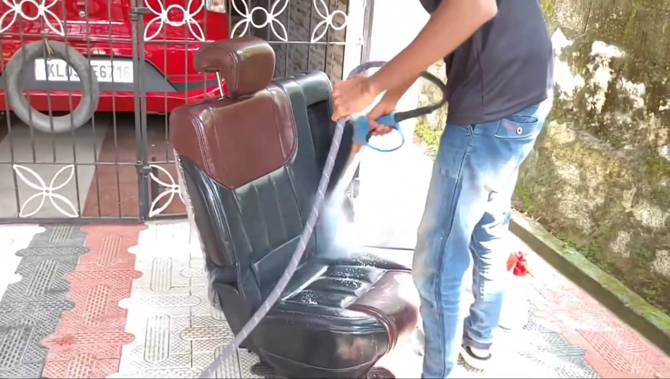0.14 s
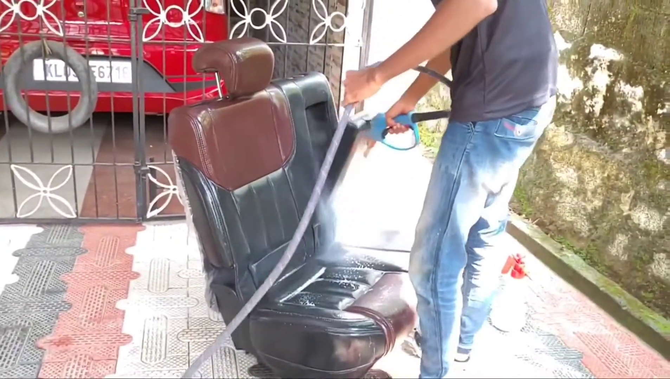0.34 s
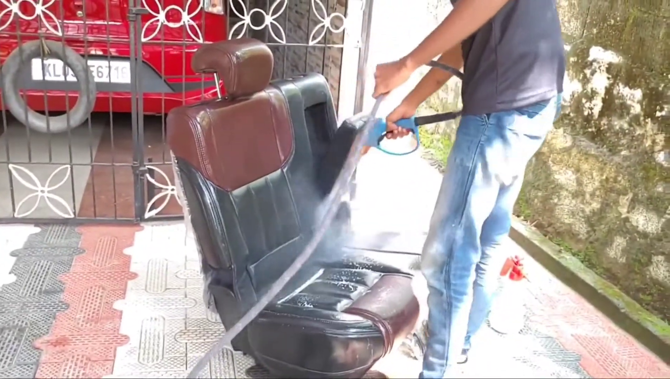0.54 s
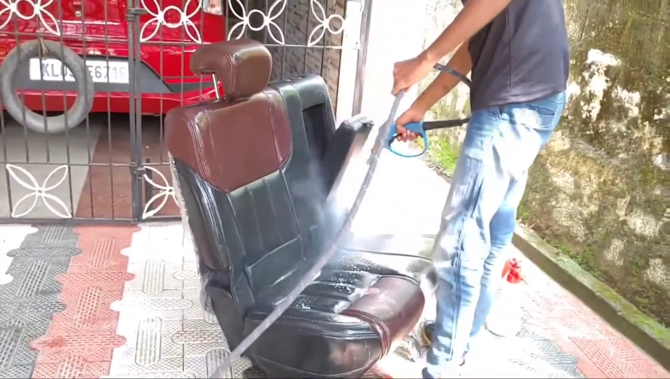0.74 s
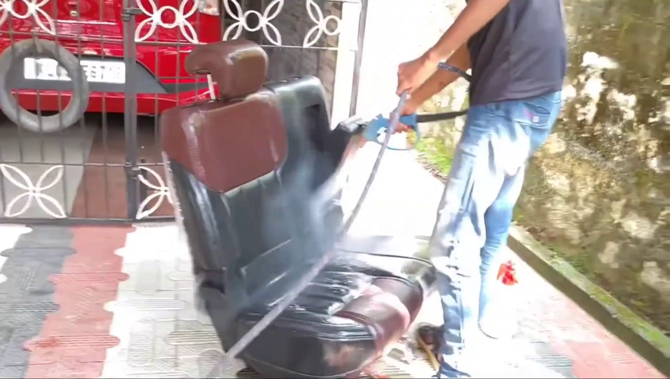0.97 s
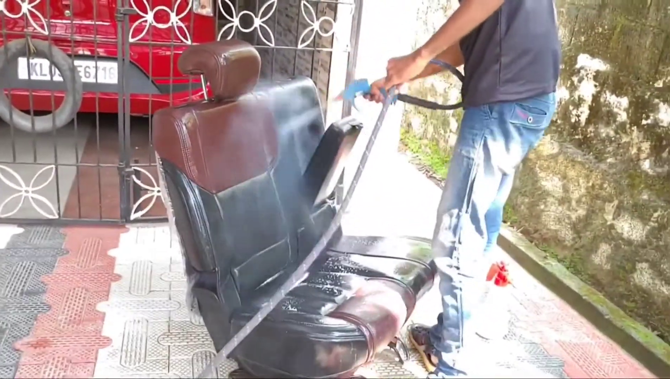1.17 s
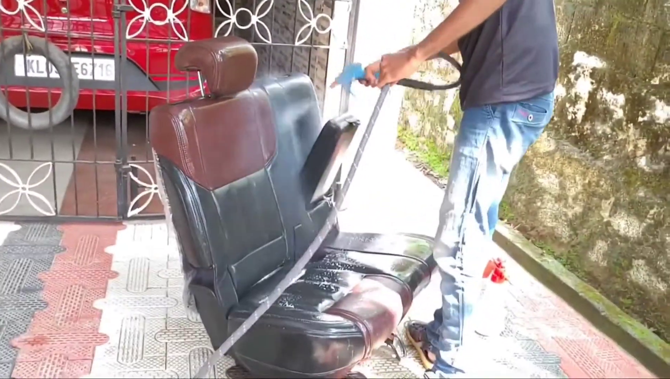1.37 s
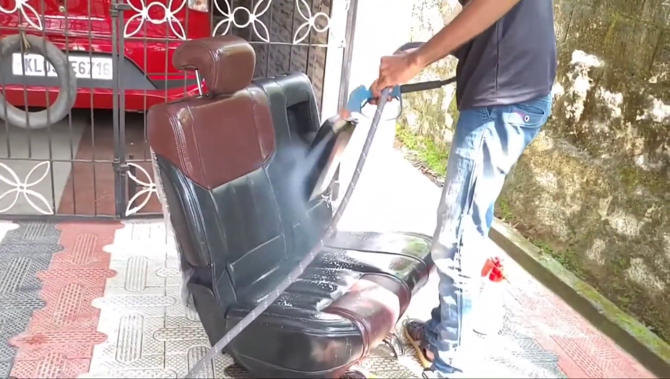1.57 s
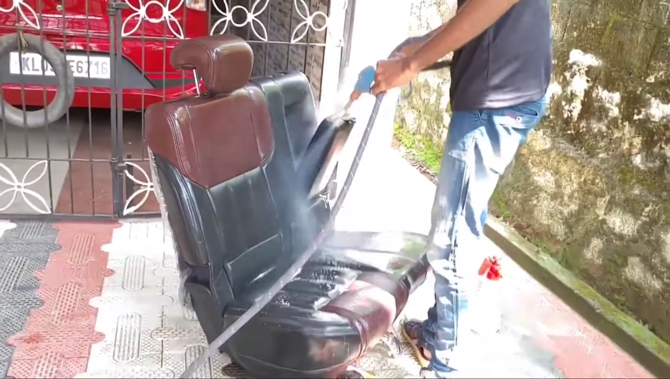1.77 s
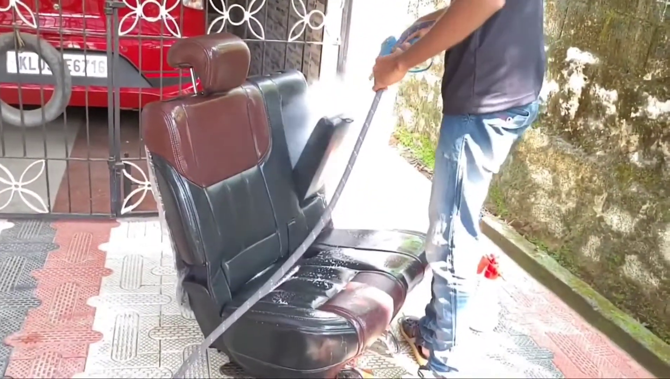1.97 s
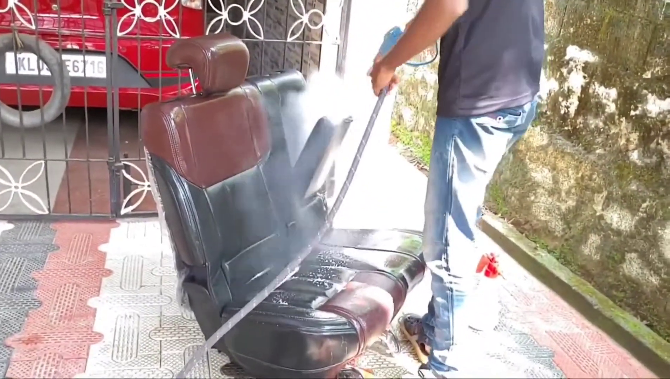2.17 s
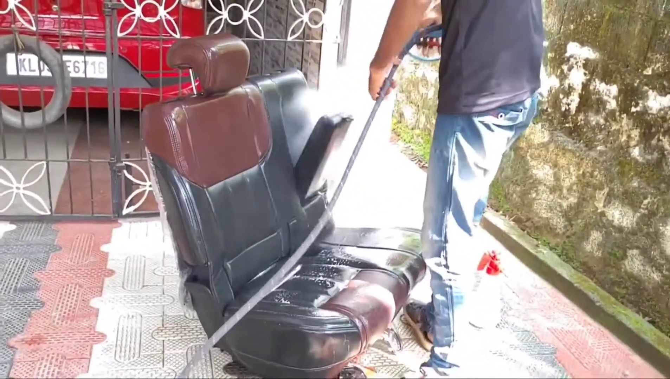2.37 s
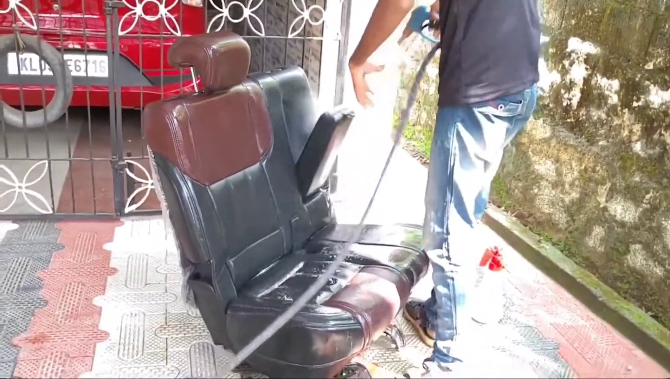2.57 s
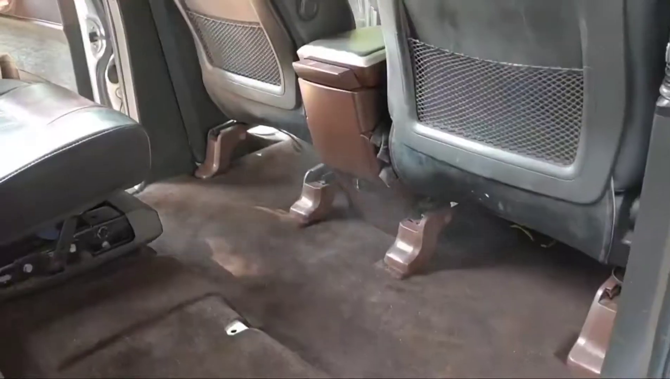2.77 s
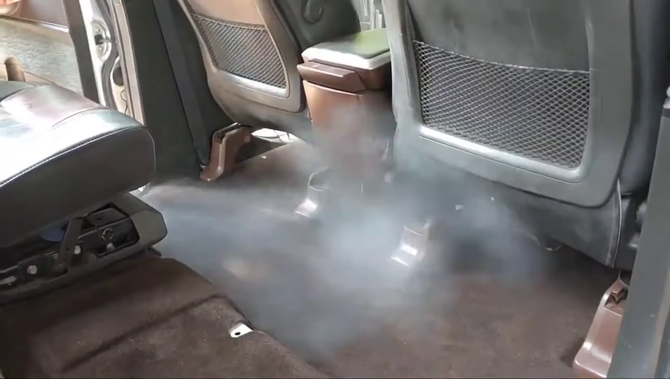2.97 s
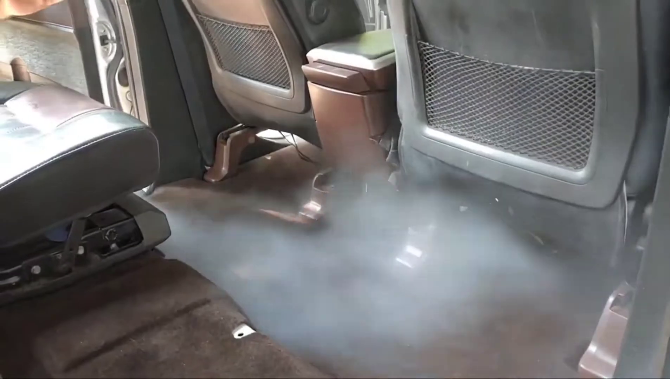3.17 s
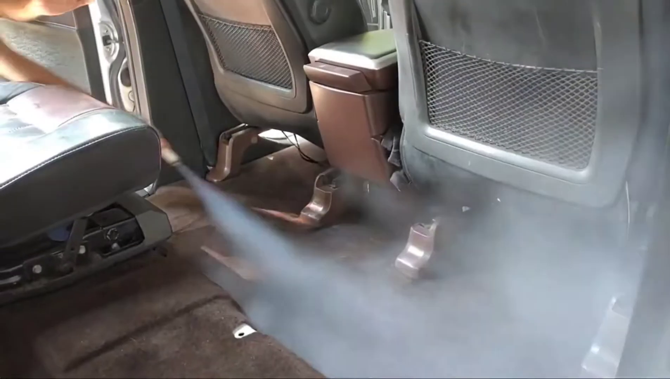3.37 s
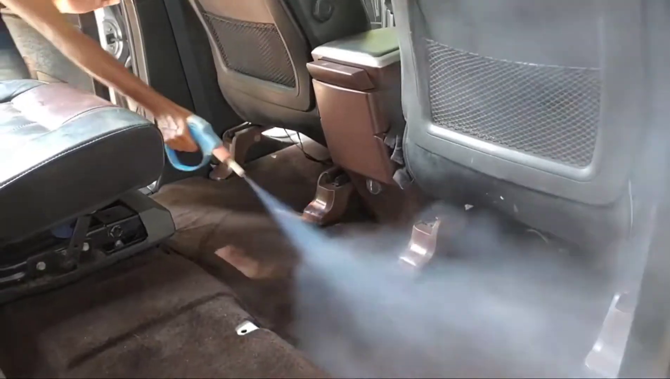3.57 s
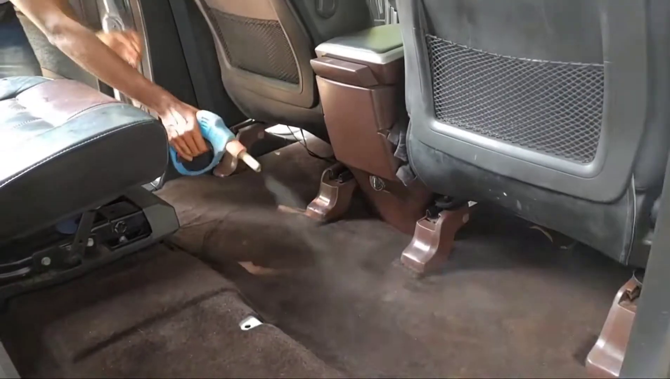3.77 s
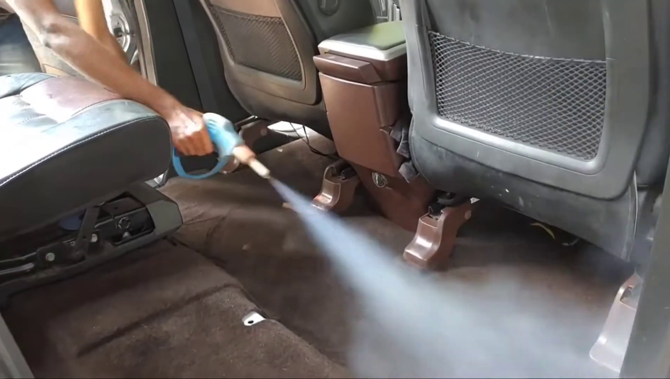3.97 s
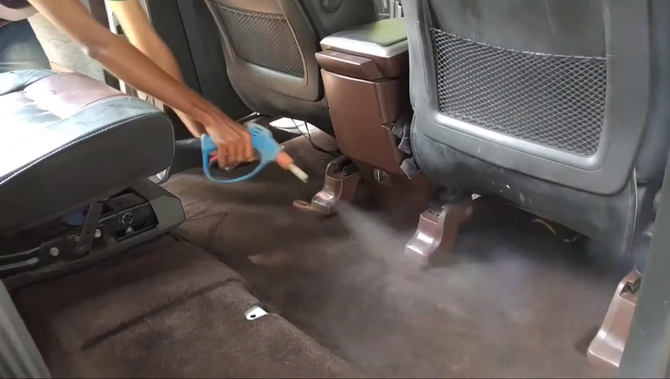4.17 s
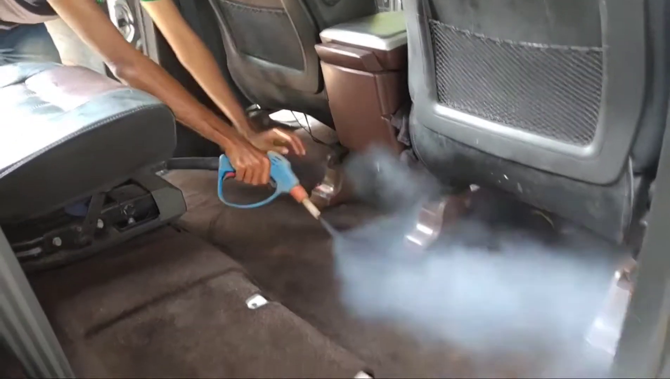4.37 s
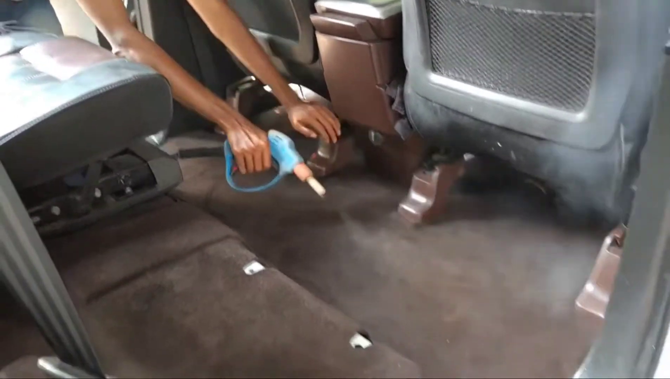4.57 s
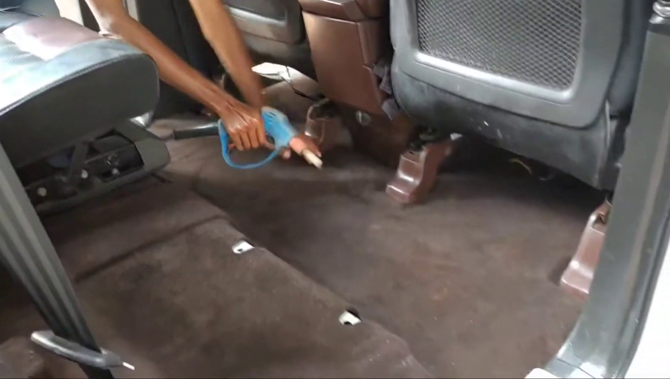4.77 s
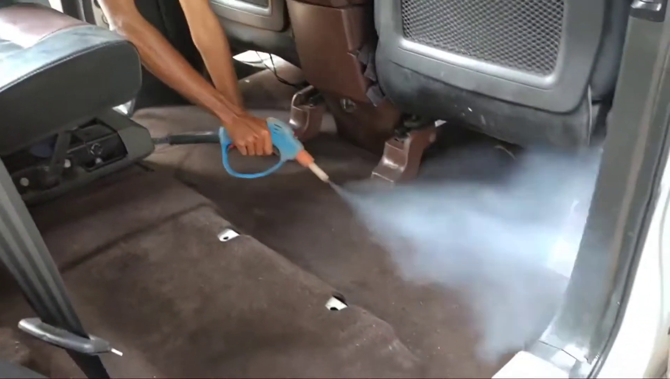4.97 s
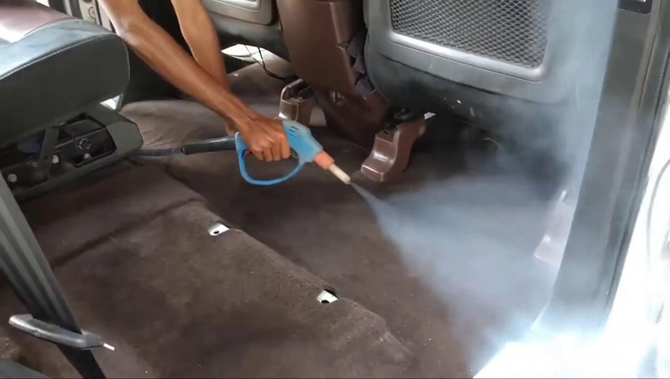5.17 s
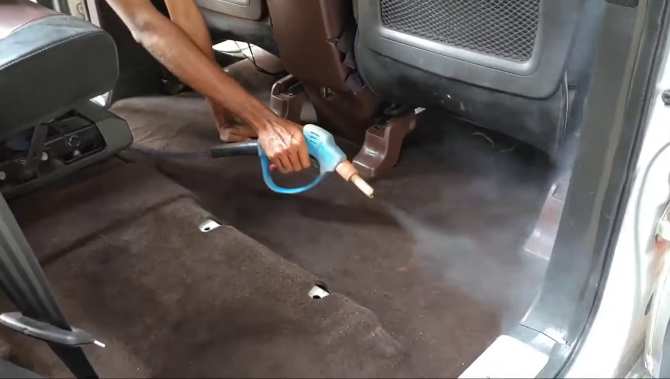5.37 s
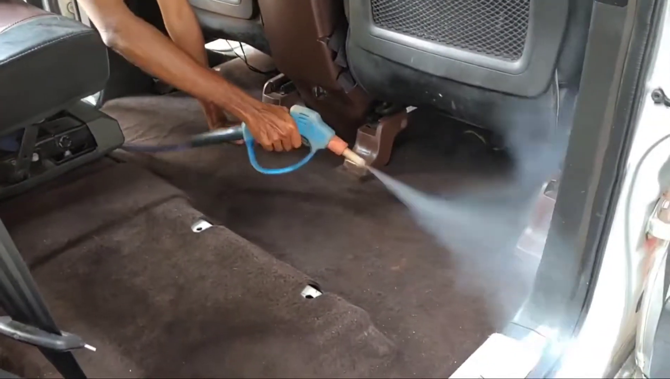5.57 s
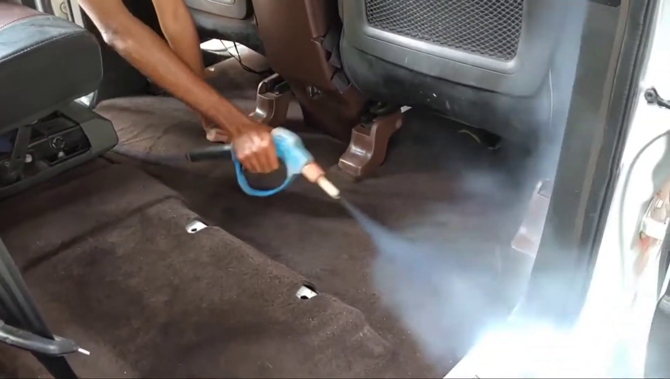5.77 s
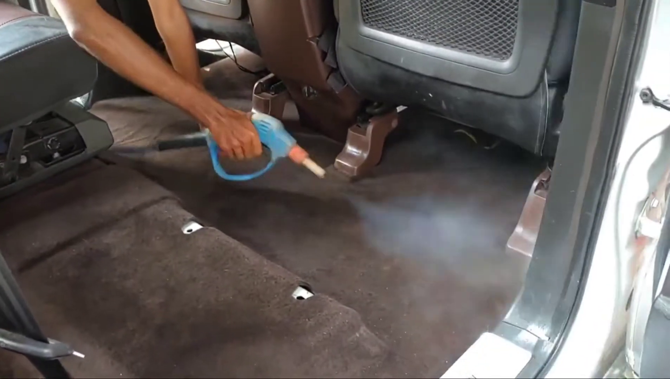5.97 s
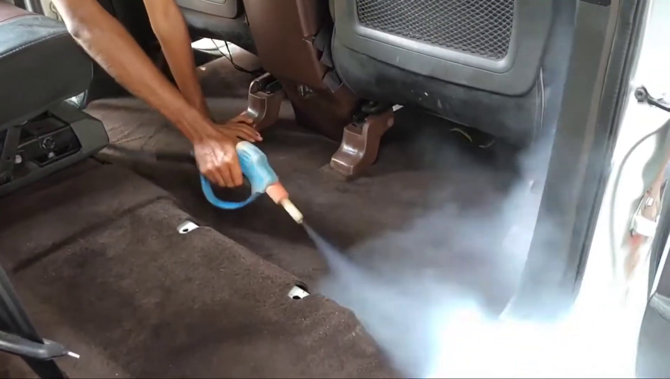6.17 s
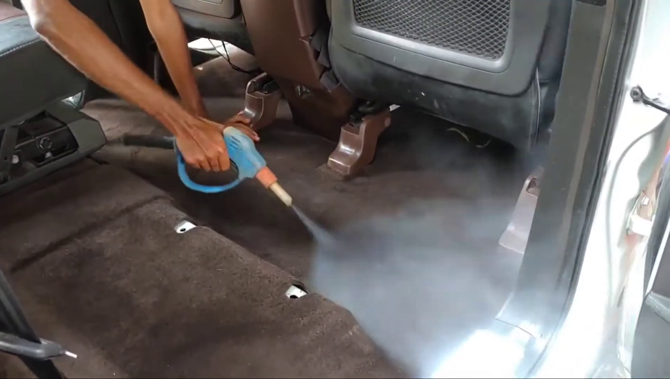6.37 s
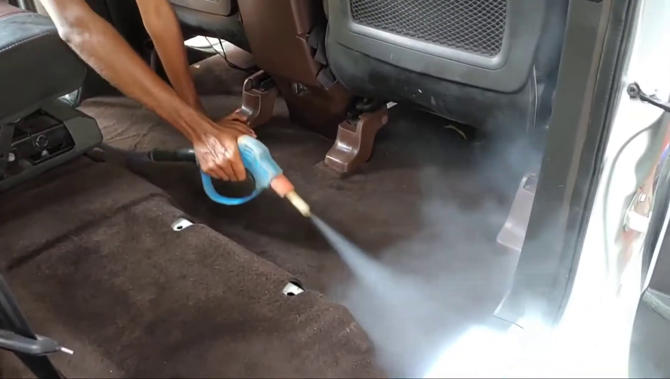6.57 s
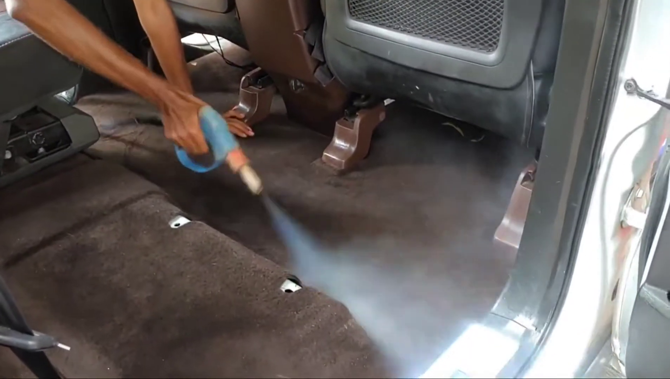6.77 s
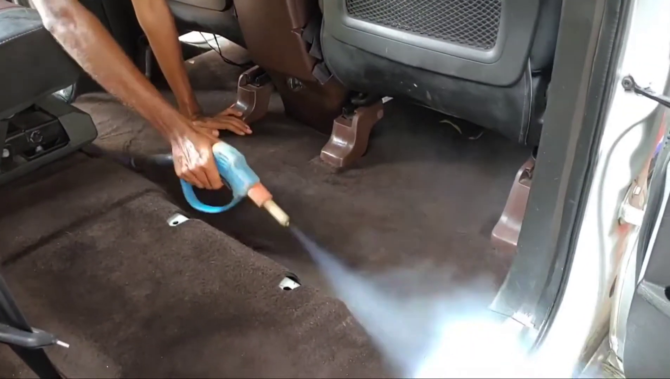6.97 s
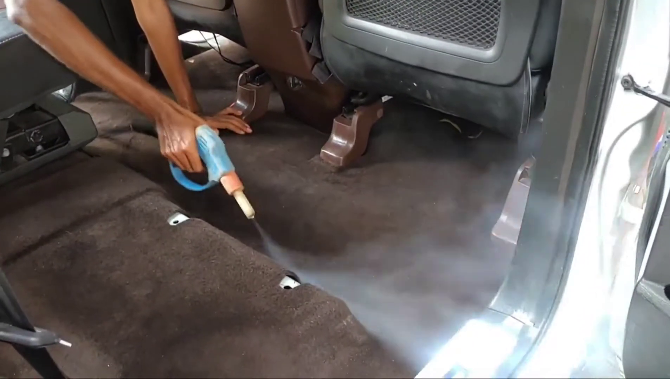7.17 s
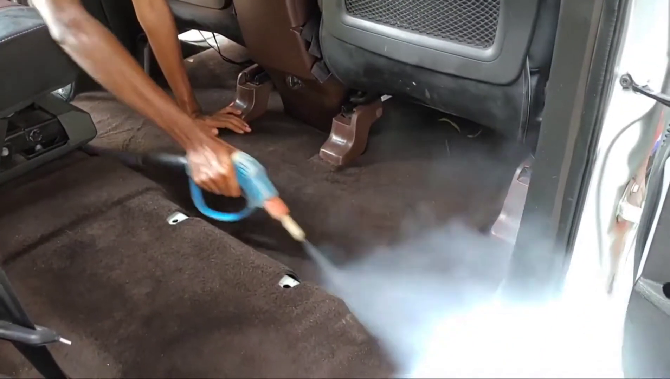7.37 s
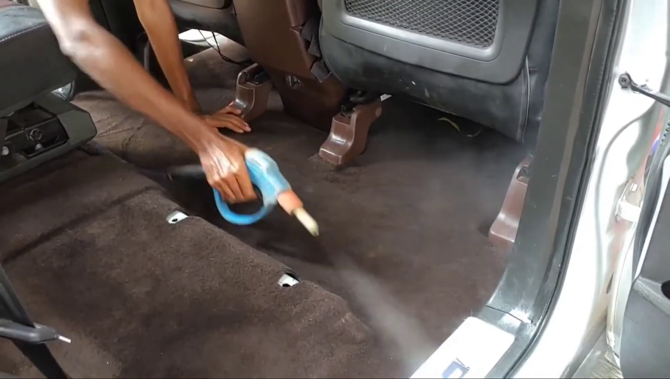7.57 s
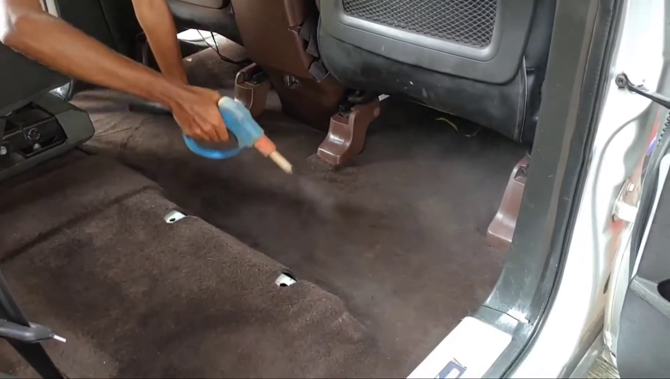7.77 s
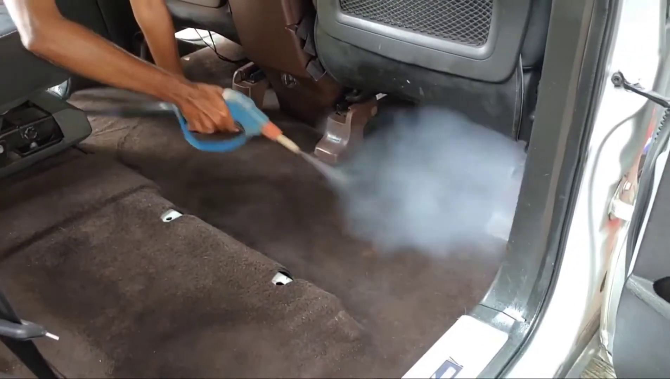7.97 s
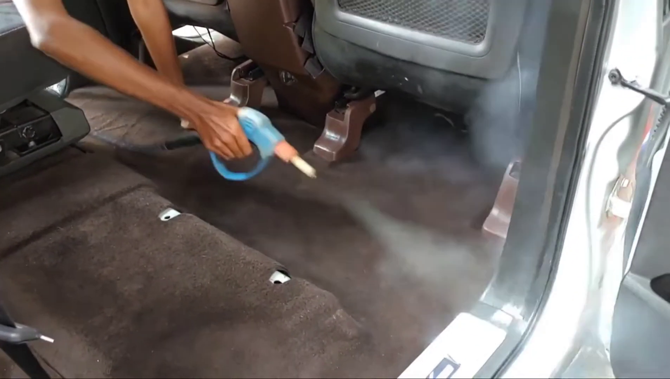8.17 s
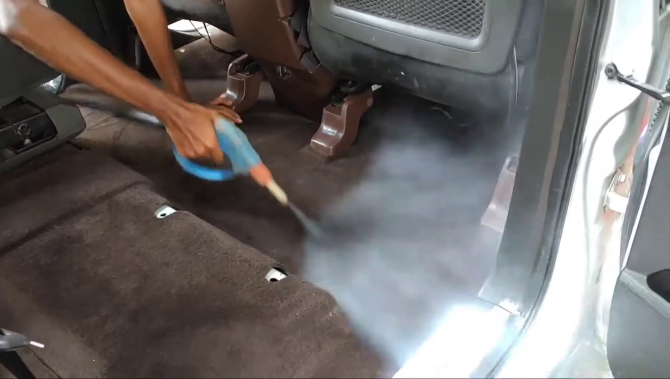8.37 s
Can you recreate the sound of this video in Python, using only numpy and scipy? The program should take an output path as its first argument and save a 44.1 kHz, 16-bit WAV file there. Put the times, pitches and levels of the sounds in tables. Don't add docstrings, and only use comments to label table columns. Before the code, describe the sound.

Soft continuous jet hiss over faint traffic rumble, followed abruptly by short, harsh steam blasts at close range, separated by brief near-quiet gaps.

```python
import sys
import numpy as np
from scipy import signal
from scipy.fft import rfft, irfft, next_fast_len
from scipy.io import wavfile
from scipy.ndimage import uniform_filter1d, map_coordinates

SR = 44100
rng = np.random.default_rng(int(sys.argv[2]) if len(sys.argv) > 2 else 0)


def wav_out(sig):
    wavfile.write(sys.argv[1], SR, np.round(np.clip(np.atleast_2d(sig).T, -1, 1) * 32767).astype(np.int16))


def rack_gain(trim_db):
    fader = np.asarray(trim_db, float)
    return 10 ** (fader / 20)


N = 371763

# time in seconds, rumble level in dB.
STREET = [(0.0, -42.5), (0.21, -50), (0.46, -41), (0.75, -43), (1.2, -44.5), (1.95, -49), (2.33, -44),
          (2.6, -45), (2.9, -45), (2.97, -35), (3.86, -45), (4.0, -47), (4.75, -45), (5.6, -45),
          (7.05, -45.5), (7.8, -47.5), (8.0, -37.5), (8.1, -46)]
# frequency in Hz, density in dB per Hz.
RUMBLE_COLOUR = [(13, -52.5), (22, -22), (43, -8), (55, 4.5), (71, 6.5), (87, 9), (162, -7), (227, -18.5),
                 (260, -10), (340, -23.5), (570, -120)]
# frequency in Hz, density in dB per Hz.
WASH_COLOUR = [(88, -37), (150, -15), (371, -16), (450, -17.5), (578, -20.5), (636, -19.5), (972, -20.5),
               (1910, -22.5), (2140, -20), (4290, -33.5), (7640, -38), (10800, -57.5), (12400, -42),
               (15000, -49)]
# frequency in Hz, width in Hz, level over the wash in dB.
PUMP = [(147.3, 8, 0), (198.4, 8.7, -1), (720, 13, -7.5)]
# time in seconds, wash gain in dB, width in seconds.
GRIPS = [(2.96, 7.5, .04), (4.03, 3, .04), (5.0, 4.5, 0.15), (8.0, 1.5, 0.064)]
# frequency in Hz, density in dB per Hz.
LEAK_COLOUR = [(5500, -29), (6500, -5), (7500, 3), (8400, -6), (9300, -21), (11500, -25), (12500, -9),
               (15500, -22)]
# time in seconds, peak in dB, pitch in Hz, 60 dB decay in seconds.
KNOCKS = [(1.177, -21, 132, 0.029), (1.18, -30, 420, 0.02), (1.986, -37, 284, 0.2), (2.95, -33, 90, 0.05),
          (2.986, -20, 95, 0.09), (3.061, 2, 169, 0.0097), (3.244, -5, 106, 0.051), (3.255, -4, 260, 0.012),
          (3.362, -7, 120, 0.024), (7.521, -11.5, 82, 0.27), (7.15, -9.5, 101, 0.14),
          (5.703, -3, 70, 0.045)]
# time in seconds, level in dB.
WHISTLE = [(3.81, -90), (3.83, -60), (3.88, -55), (3.91, -61), (3.97, -59), (4.04, -61), (4.06, -90)]

# time in seconds, jet level in dB, splash level in dB.
SPRAY = [(0.0, -32, -43), (0.3, -31, -40.5), (0.5, -32, -44.5), (1.0, -32, -43.5), (1.22, -31.5, -47),
         (1.41, -34, -47), (1.68, -31.5, -45.5), (2.19, -33, -43.5), (2.46, -31, -46.5)]
# time in seconds, splash gain in dB, width in seconds.
SEAMS = [(.72, 6.5, 0.074), (1.17, 8.5, 0.052), (2.0, 1.5, 0.031), (2.33, 1.5, 0.067)]
# frequency in Hz, density in dB per Hz.
FAR_FIZZ_COLOUR = [(6350, -44), (10800, -3.5), (11300, -9.5), (11800, 0), (12400, 3), (13600, -2.5),
                   (15300, -2), (15700, -12)]
FAR_HISS_COLOUR = [(1060, -27), (1800, -13.5), (2350, -2), (3870, -1.5), (4900, 2), (5460, 1.5),
                   (5890, -1.5), (6920, -0.5), (8060, -6.5), (10100, -5), (11200, -24), (14600, -30),
                   (22000, -120)]
SPLASH_COLOUR = [(82, -33), (140, -3.5), (225, -3), (267, 1), (307, -3), (875, -3.5), (971, -3.5),
                 (2200, -3), (2860, -29.5), (4840, -120)]

# opening and shutting times in seconds, flow, roar and crackle levels in dB.
BLASTS = [(2.7, 2.99, -37, -38.5, -56), (2.999, 3.151, 1, -27.5, -22.5), (3.224, 3.369, 1, -22, -27),
          (3.401, 3.571, -1, -20.5, -20.5), (3.609, 3.804, -1, -20, -25), (4.06, 4.284, -1, -20.5, -23),
          (4.378, 4.602, 0, -19.5, -24), (5.061, 5.439, -1, -20, -22), (5.454, 5.515, -12.5, -60, -52),
          (5.707, 6.017, 0, -21, -23), (6.154, 6.362, 0, -20, -23.5), (6.429, 6.626, 0.5, -17, -25.5),
          (6.7, 6.902, 0.5, -18.5, -21.5), (6.897, 6.959, -3, -35, -31), (7.147, 7.33, -0.5, -19.5, -24),
          (7.469, 7.633, 1, -21.5, -23), (8.068, 8.276, 0.5, -20.5, -21.5), (8.427, 8.5, 2, -6.5, -22)]
# frequency in Hz, width in Hz, level in dB.
LANCE = [(2930, 400, -3), (3700, 500, -1.5), (4440, 670, -2), (5730, 370, -2)]
# time in seconds, level in dB.
CLEARING = [
    (2.984, -67),
    (2.992, -31),
    (3.03, -24.5),
    (3.1, -31),
    (3.155, -41),
    (3.19, -70),
]
# time in seconds, roar loss in dB, width in seconds.
LULLS = [(3.0, 9, 0.021), (3.14, 6.5, 0.017), (3.36, 4, 0.033), (3.781, 6.5, 0.0095), (4.5, 13, 0.028),
         (5.152, 11, 0.024), (5.43, 10.5, 0.019), (5.742, 12, 0.0089), (4.535, 6.5, 0.018),
         (4.41, 9, 0.014), (6.29, 10, 0.011), (6.455, 11, 0.016), (6.62, 5.5, 0.075)]
# time in seconds, crackle gain in dB, width in seconds.
SLUGS = [(3.65, 7.5, 0.059), (4.09, 5.5, 0.047), (7.2, 6.5, .04), (5.25, 3, .05), (6.2, 3, .04),
         (6.55, 6, 0.034)]
# time in seconds, fizz gain in dB, width in seconds.
FACING = [
    (3.6, 3, 0.29),
    (4.15, 1, .1),
    (5.2, 1, 0.093),
    (6.0, -1, 0.11),
    (7.4, -1.5, .2),
    (8.15, -1.5, .1),
]
# frequency in Hz, density in dB per Hz.
FIZZ_COLOUR = [(6350, -18), (10800, -10.5), (11100, -23), (11900, 2), (12400, 4), (14700, -3.5),
               (15700, -2)]
HISS_COLOUR = [(1650, -19), (2800, -14), (3530, -16), (3830, -18.5), (4610, -14.5), (5950, -13.5),
               (6760, -4.5), (7590, -0.5), (8330, -8), (9520, -8), (10900, -22), (11200, -9), (14600, -41),
               (22000, -120)]
ROAR_COLOUR = [(13, -41), (22, -8), (54, 1.5), (162, 1), (459, -5), (599, -7.5), (999, -11), (1500, -21),
               (1950, -23), (3300, -120)]
CRACKLE_COLOUR = [(530, -7), (900, -6), (982, -7), (1070, -4), (2450, -7.5), (4500, -19), (5850, -52),
                  (9900, -120)]

# frequency in Hz, side minus mid in dB.
NEAR_SIDE = [(60, -31.5), (110, -41.5), (200, -37.5), (380, -32), (700, -32), (1290, -39.5), (2380, -29.5),
             (4400, -28), (8120, -27.5), (15000, -15.5)]
FAR_SIDE = [(60, -9), (110, -0.5), (200, -15.5), (380, -13.5), (700, -13.5), (1290, -13.5), (2380, -14.5),
            (4400, -21), (8120, -13), (15000, -15)]
# time in seconds, side gain in dB, share of side bands kept from 0 to 1.
WIDTH = [(0, 10.5, 0.83), (1.18, 12, 1), (1.21, 12, 0.17), (2.5, 2, 0.39), (2.8, -3, 1), (2.92, 12, 1),
         (3.05, 31, 0.1), (3.09, -2, 0.6), (8.43, -6, 0.63)]
# frequency in Hz, change of the share kept.
SIDE_KEPT = [(2200, .3), (3600, -0.31), (6600, 0.05), (7600, -.2), (8800, .4), (11000, -.45), (12500, 0),
             (15000, -0.06)]

FADE_S, FADE_DB_PER_S, FADE_FIZZ = 2.463, 140, 1.45
FADE_IN_S, FADE_IN_DB_PER_S = 2.94, 130
CABIN_DB, DUCK_DB, RECOVER_S = -57, 8, 0.084
FAR_FIZZ_DB, FAR_FIZZ_LAW = -34, 0.46
FIZZ_DB, HISS_DB, LEAK_DB = -13, -23.5, -67.5
RISE_S, RISE_CURVE = 0.0185, 2.1
SHUT_S, SHUT_DB, BLEED_DB_PER_S = 0.029, 15, 168
SURGE_DB, SURGE_S, RECHARGE_S = 6, 0.058, 0.26
ROAR_LAG_S, ROAR_EARLY_S = 0.0085, 0.003
FIZZ_LAW, ROAR_LAW, CRACKLE_LAW, LULL_CRACKLE = 1.19, 2.3, 2.9, 0.49


def unit(x):
    return x / np.sqrt(np.mean(x ** 2) + 1e-20)


def along(points, hz):
    f, v = np.transpose(points)
    return np.interp(np.log(hz + 1), np.log(f + 1), v)


def gains(rows):
    s, *cols = np.transpose(rows)
    t = np.arange(N) / SR
    return [rack_gain(np.interp(t, s, c, left=-120, right=-120)) for c in cols]


def humps(rows):
    t = np.arange(0, N / SR, 0.002)
    swell_db = sum(db * np.exp(-((t - s) / width) ** 2) for s, db, width in rows)
    return np.interp(np.arange(N) / SR, t, swell_db)


def wobble(rate):
    knots = rng.standard_normal(int(N * rate / SR) + 4)
    return map_coordinates(knots, [np.arange(N) * rate / SR])


def filtered(x, response):
    m = next_fast_len(N + 8192)
    return irfft(rfft(x, m) * response(np.fft.rfftfreq(m, 1 / SR)), m)[..., :N]


def patchy(patchy_db):
    z = signal.stft(rng.standard_normal((2, N)), nperseg=1024)[2]
    chance = rng.standard_normal(z.shape)
    patches = uniform_filter1d(uniform_filter1d(chance[0], size=16, axis=0), size=6, axis=1)
    streaks = uniform_filter1d(uniform_filter1d(chance[1], size=2, axis=0), size=4, axis=1)
    gain_db = patchy_db * unit(patches) + 2.56 * unit(streaks)
    return unit(signal.istft(z * rack_gain(gain_db), nperseg=1024)[1][:, :N])


def stereo(pair, spectrum, side_db):
    mid, side = filtered(pair, lambda hz: rack_gain(along(spectrum, hz) + [0 * hz, along(side_db, hz)]))
    return unit(np.array([mid + side, mid - side]))


def resonant(modes):
    def peaks(f):
        total = 0
        for k, (hz, width, db) in enumerate(modes):
            total = total + (-1) ** k * rack_gain(db) * 1j * f * width / (hz * hz - f * f + 1j * f * width)
        return total
    return unit(filtered(rng.standard_normal(N), peaks))


def ducking():
    t = np.arange(N) / SR
    shuts = np.array([-9] + [shut for _, shut, *_ in BLASTS[1:]])
    last_shut = shuts[np.searchsorted(shuts, t) - 1]
    return DUCK_DB * np.exp((last_shut - t) / RECOVER_S)


def street(duck_db):
    level = gains(STREET)[0] * rack_gain(1.5 * wobble(10))
    low = stereo(patchy(patchy_db=-1.5), RUMBLE_COLOUR, NEAR_SIDE)
    low = low / np.sqrt(np.abs(uniform_filter1d(low[0] ** 2, size=3500)) + 0.11)
    return level * rack_gain(-0.6 * duck_db) * low


def cabin(duck_db):
    t = np.arange(N) / SR
    level = rack_gain(CABIN_DB + humps(GRIPS) - duck_db) * np.clip((t - 2.45) / 0.16, 0, 1)
    pump = sum(rack_gain(db) * resonant([(hz, width_hz, db)]) for hz, width_hz, db in PUMP)
    wash = rack_gain(3.0) * stereo(patchy(patchy_db=0.4), WASH_COLOUR, FAR_SIDE)
    return level * (wash + (t > 2.93) * pump)


def cabin_fade():
    return FADE_IN_DB_PER_S * np.minimum(np.arange(N) / SR - FADE_IN_S, 0)


def leak():
    level = rack_gain(LEAK_DB + cabin_fade() + 1.5 * wobble(5))
    return level * stereo(rng.standard_normal((2, N)), LEAK_COLOUR, FAR_SIDE)


def hose():
    out, t = np.zeros(N + SR), np.arange(SR // 4) / SR
    onset = 1 - np.exp(-t / 0.00061)
    for s, db, hz, t60 in KNOCKS:
        out[round(s * SR):][:len(t)] += rack_gain(db - 60 * t / t60) * np.sin(2 * np.pi * hz * t) * onset
    return out[:N]


def valve_whistle():
    hz = 3530 + 25 * wobble(90)
    return gains(WHISTLE)[0] * rack_gain(1.5 * wobble(60)) * np.sin(2 * np.pi * np.cumsum(hz) / SR)


def yard():
    t = np.arange(N) / SR
    s, jet_db, splash_db = np.transpose(SPRAY)
    fade_db = -FADE_DB_PER_S * np.maximum(t - FADE_S, 0)
    return np.interp(t, s, jet_db), np.interp(t, s, splash_db) + humps(SEAMS), fade_db


def splash():
    _, splash_db, fade_db = yard()
    return rack_gain(splash_db + fade_db) * stereo(patchy(patchy_db=-3.5), SPLASH_COLOUR, FAR_SIDE)


def spray():
    jet_db, _, fade_db = yard()
    swing_db = FAR_FIZZ_LAW * (jet_db - jet_db[0])
    fizz = rack_gain(FAR_FIZZ_DB + swing_db + FADE_FIZZ * fade_db + 0.7 * wobble(2.7))
    hiss = rack_gain(jet_db + 0.22 * humps(SEAMS) + fade_db + 0.23 * wobble(5.95))
    flutter = rack_gain(0.13 * wobble(29.8) + 0.1 * wobble(150))
    jet = fizz * stereo(patchy(patchy_db=1.5), FAR_FIZZ_COLOUR, FAR_SIDE)
    jet = jet + hiss * stereo(patchy(patchy_db=1), FAR_HISS_COLOUR, FAR_SIDE)
    return flutter * jet


def lance():
    return gains(CLEARING)[0] * resonant(LANCE)


def valve(t, opened, shut):
    ramp = np.clip(1 - (opened - t) / RISE_S, 0, 1) ** RISE_CURVE
    fall_db = -SHUT_DB * np.clip((t - shut) / SHUT_S, 0, 1)
    return ramp, fall_db - BLEED_DB_PER_S * np.maximum(t - shut - SHUT_S, 0)


def pressure():
    level, lull_db, last_shut = np.zeros((4, N)), humps(LULLS), BLASTS[0][0]
    for opened, shut, flow_db, roar_db, crackle_db in BLASTS:
        span = slice(round((opened - RISE_S) * SR), round((shut + 0.5) * SR))
        t = np.arange(N)[span] / SR
        ramp, loss_db = valve(t, opened, shut)
        late, early_db = valve(t, opened + ROAR_LAG_S, shut - ROAR_EARLY_S)
        stored_db = SURGE_DB * (1 - np.exp((last_shut - opened) / RECHARGE_S))
        surge_db = stored_db * np.exp(-np.maximum(t - opened, 0) / SURGE_S)
        fizz = ramp * rack_gain(FIZZ_DB + FIZZ_LAW * (flow_db + loss_db) + 0.1 * surge_db)
        hiss = ramp * rack_gain(HISS_DB + flow_db + loss_db + surge_db)
        roar = late * rack_gain(roar_db + ROAR_LAW * early_db - lull_db[span] + 0.48 * surge_db)
        lost_db = CRACKLE_LAW * early_db - LULL_CRACKLE * lull_db[span]
        crackle = ramp * rack_gain(crackle_db + lost_db + 0.67 * surge_db)
        level[:, span] = np.maximum(level[:, span], [fizz, hiss, roar, crackle])
        last_shut = shut
    level[3] *= rack_gain(humps(SLUGS))
    level[0] *= rack_gain(humps(FACING))
    return level * rack_gain(cabin_fade())


def eddies(rate, scatter_db, push):
    when, size, sign = rng.random((3, 2, N))
    strength = rack_gain(-scatter_db * np.log(size + 0.042))
    kicks = (when < rate / SR) * strength * np.where(sign < push, 1, -1)
    return unit(filtered(kicks, lambda hz: np.exp(1j * np.arctan(140 / (hz + 30)))))


def blasts():
    fizz, hiss, roar, crackle = pressure()
    reach = roar ** 2 / (roar ** 2 + rack_gain(-70.5))
    flutter = rack_gain(0.25 * wobble(40) + 0.6 * wobble(200))
    jet = fizz * stereo(patchy(patchy_db=1.5), FIZZ_COLOUR, NEAR_SIDE)
    jet = jet + hiss * stereo(patchy(patchy_db=2.5), HISS_COLOUR, NEAR_SIDE)
    kicks = eddies(rate=260, scatter_db=2.0, push=0.78)
    thumps = stereo(kicks + 0.62 * patchy(patchy_db=4.0), ROAR_COLOUR, NEAR_SIDE)
    thumps = thumps / np.sqrt(np.abs(uniform_filter1d(thumps[0] ** 2, size=2600)) + 0.15)
    bursts = 0.26 * kicks + eddies(rate=1800, scatter_db=4.1, push=0.7)
    snaps = stereo(bursts + 0.34 * patchy(patchy_db=-2.5), CRACKLE_COLOUR, NEAR_SIDE)
    bunches = unit(rack_gain(1.37 * wobble(35)))
    carpet = rack_gain(3.0) * roar * thumps + rack_gain(-1.44) * crackle * snaps
    return flutter * jet + reach * bunches * carpet


def scene():
    duck_db = ducking()
    background = street(duck_db) + cabin(duck_db) + leak() + hose() + valve_whistle()
    return background + splash() + spray() + lance() + blasts()


def narrowed(x):
    mid, side = (x[0] + x[1]) / 2, (x[0] - x[1]) / 2
    hz, t, z = signal.stft(side, SR, nperseg=1024)
    s, db, kept = np.transpose(WIDTH)
    chance = rng.random((len(hz) // 12 + 1, len(t) // 3 + 1))
    blocks = np.kron(chance, np.ones((12, 3)))[:len(hz), :len(t)]
    share = np.interp(t, s, kept) + along(SIDE_KEPT, hz)[:, None]
    keep = (blocks < share) | (hz < 1800)[:, None]
    width_db = np.interp(t, s, db)
    gain_db = width_db - 8 * np.outer(hz > 8000, width_db > 12)
    side = signal.istft(z * keep * rack_gain(gain_db), SR, nperseg=1024)[1][:N]
    return np.array([mid + side, mid - side])


def top_cut(hz):
    return rack_gain(-90 / (1 + np.exp(np.clip((15490 + 90 - hz) / 40, -50, 50))))


def band_limit(x):
    return signal.sosfilt(signal.butter(12, 16510, fs=SR, output="sos"), x)


def record(dry):
    x = narrowed(dry)
    x = x / (1 + np.abs(x / 0.82) ** 5) ** (1 / 5)
    x = filtered(x, top_cut)
    return band_limit(x)


dry = scene()
out = record(dry)
wav_out(out)
```